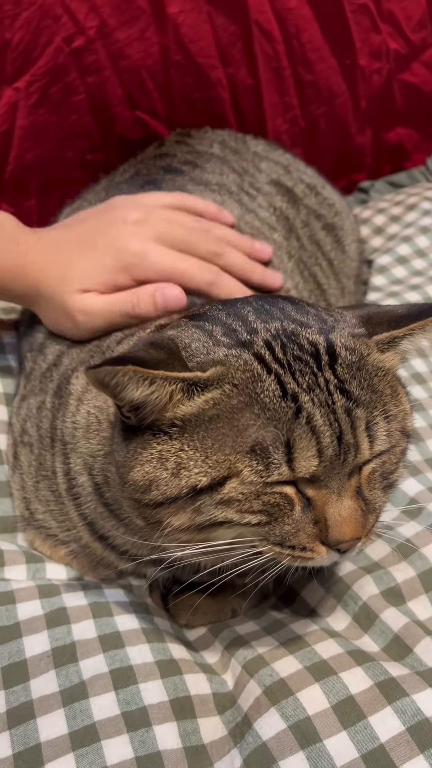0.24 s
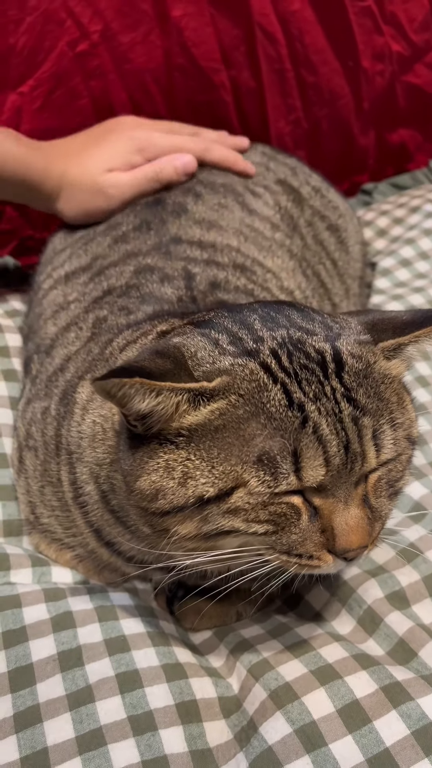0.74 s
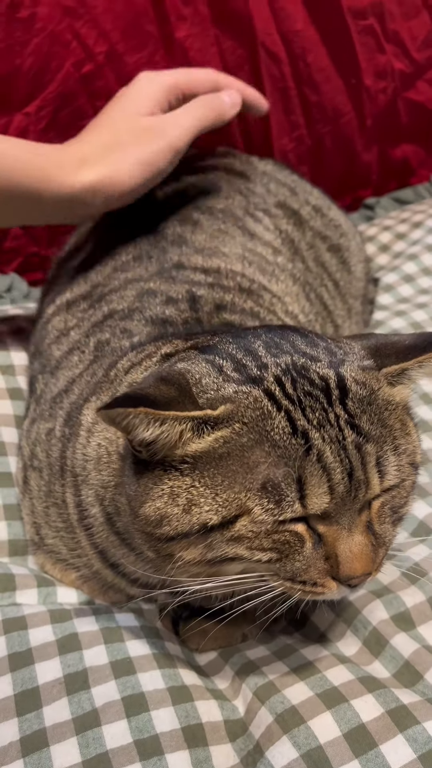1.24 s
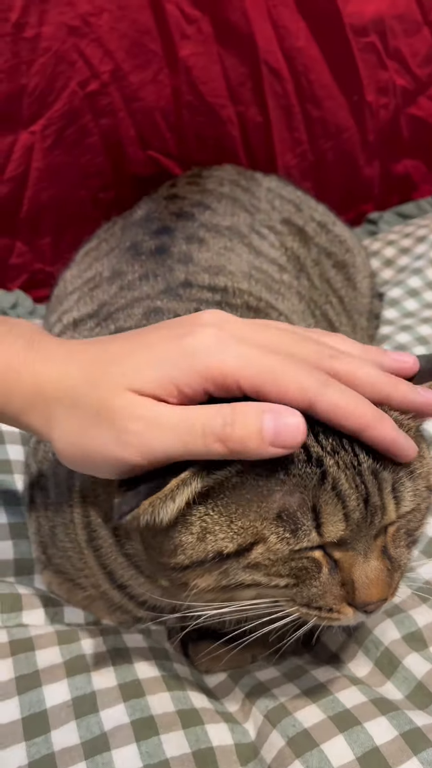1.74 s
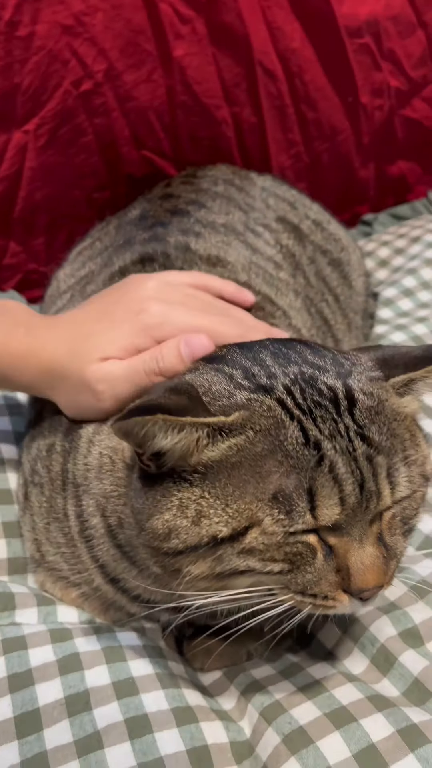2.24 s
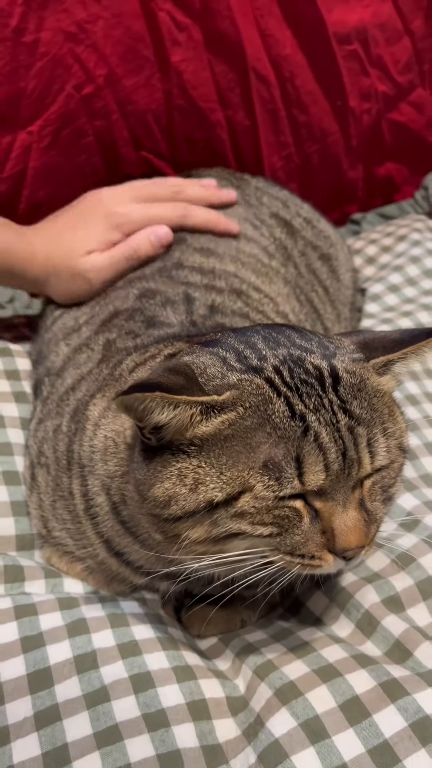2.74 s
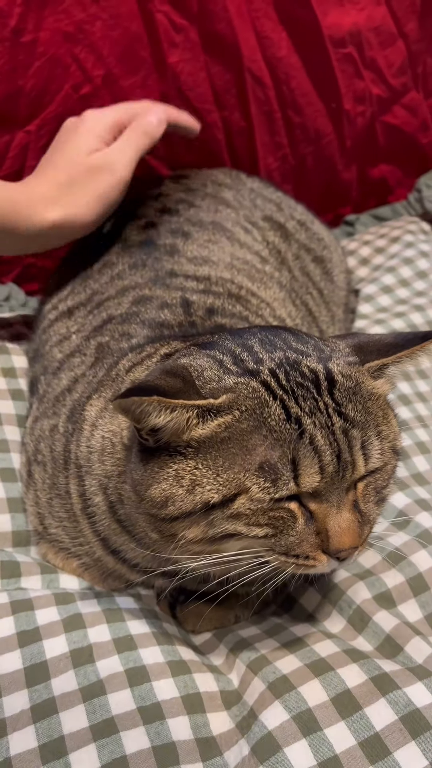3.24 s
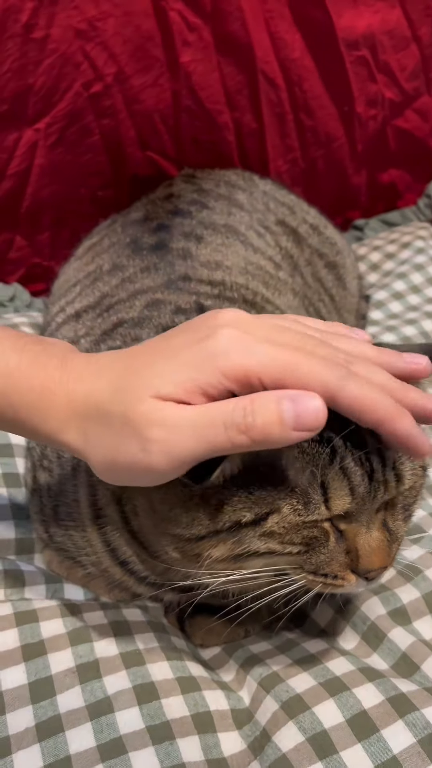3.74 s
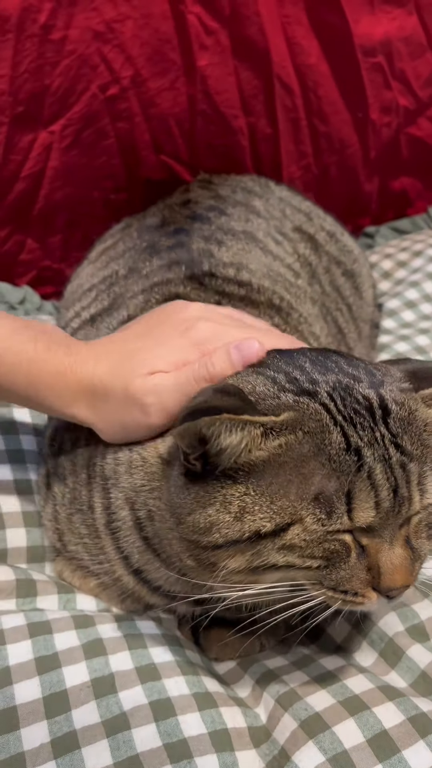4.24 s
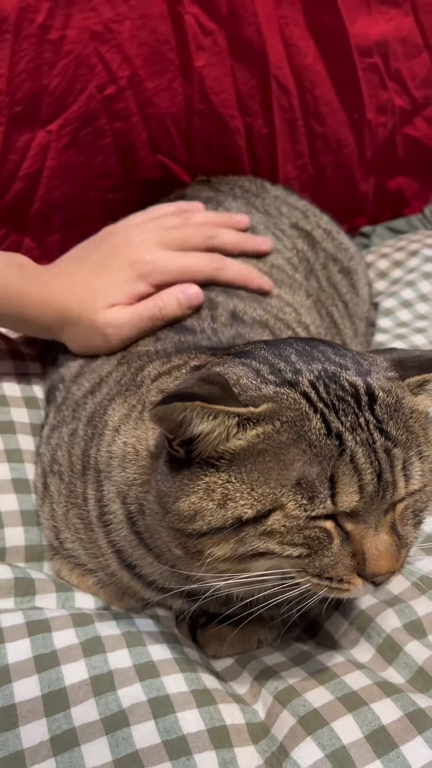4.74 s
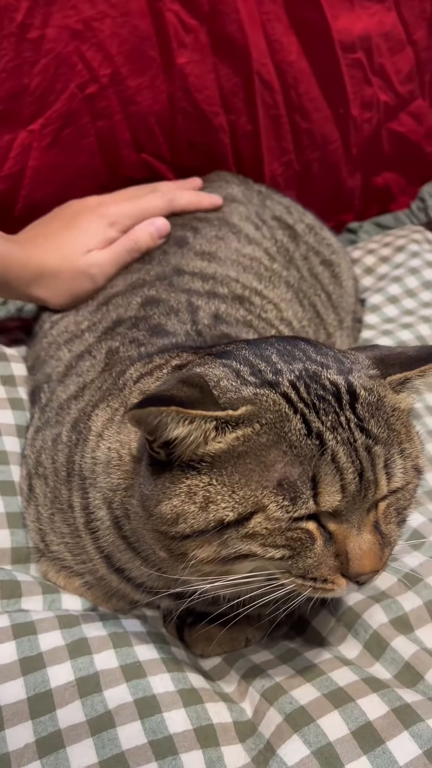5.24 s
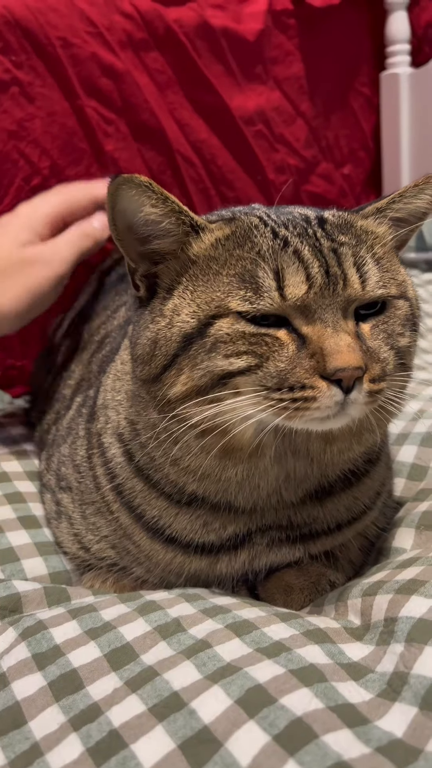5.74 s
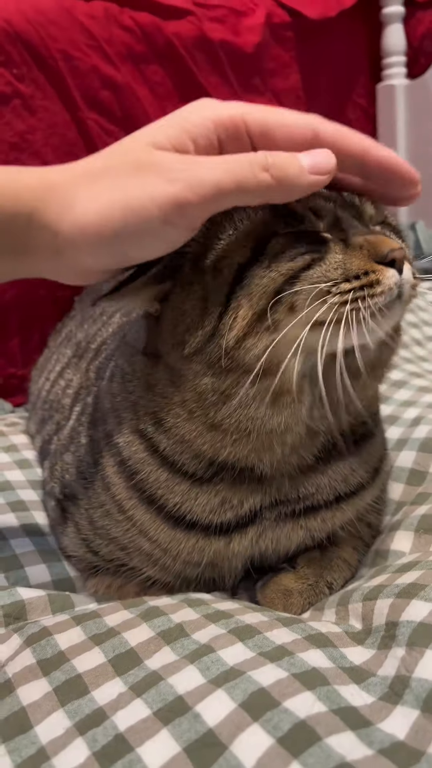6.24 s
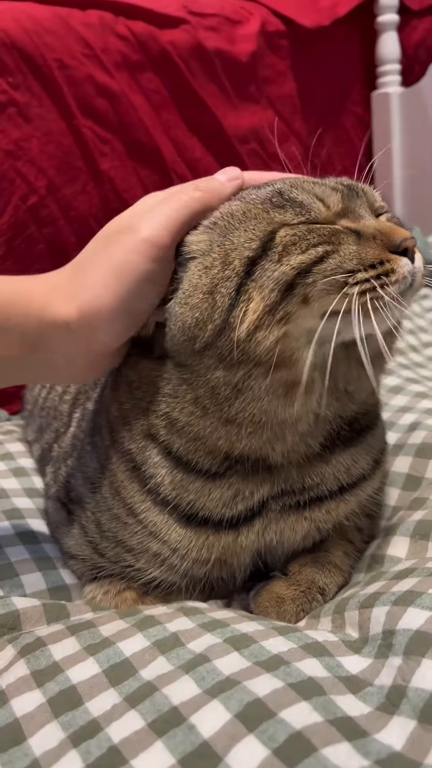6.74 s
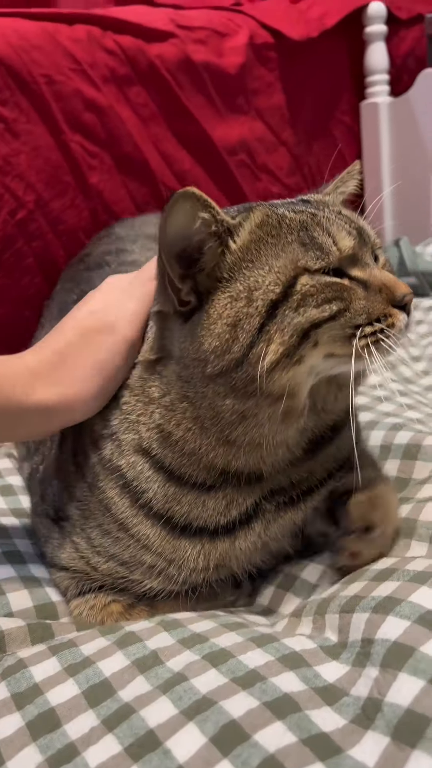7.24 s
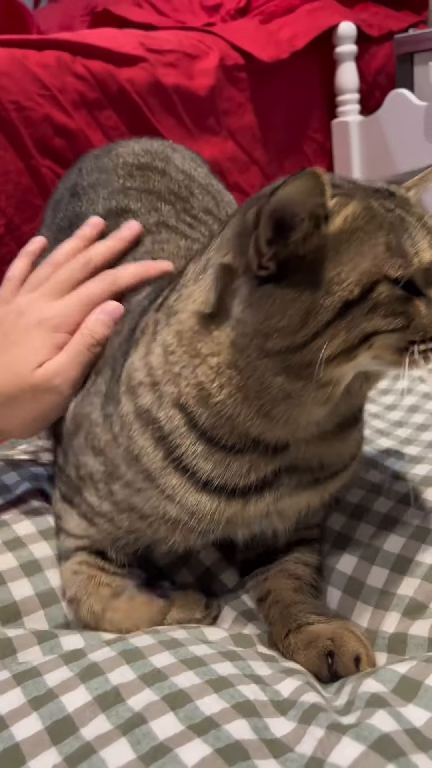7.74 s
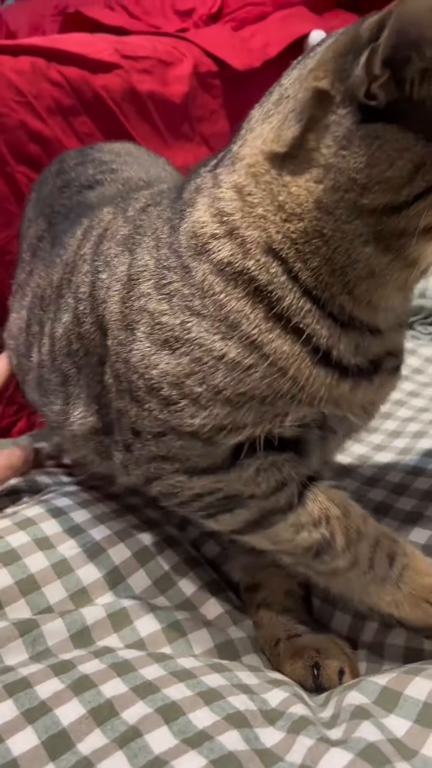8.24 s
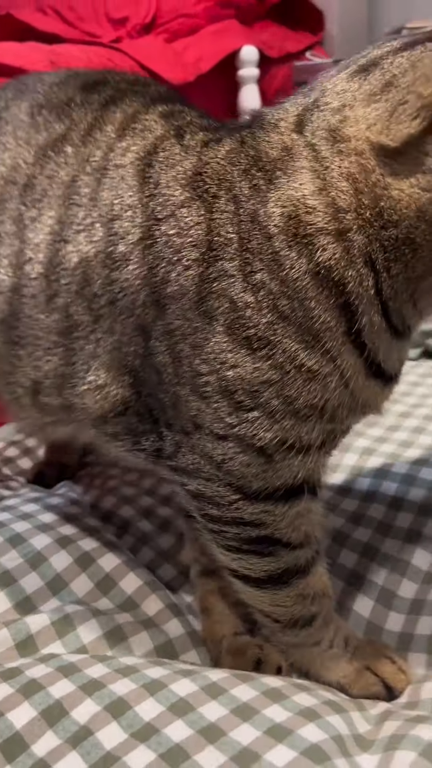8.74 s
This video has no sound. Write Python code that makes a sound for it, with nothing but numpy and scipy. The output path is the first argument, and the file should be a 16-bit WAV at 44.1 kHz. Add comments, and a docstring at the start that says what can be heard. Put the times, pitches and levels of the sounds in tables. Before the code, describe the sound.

A cat's deep, rattling purr comes in separate waves, heard by a close stereo microphone in a dry room with a quiet steady fan. Between waves there are soft fur swishes and dull little knocks from the stroking hand. A tiny dropout and hollow plop come past the middle, then a throatier purr, then rustling sheets and low bumps as the cat rises, ending with short low purr pulses.

```python
"""Cat purring on a bed

Close microphone in a small, soft bedroom: a cat just right of centre purrs in swells while a hand strokes its fur,
and at the end it gets up. Its glottis opens about 25 times a second: a tick, a thump of chest and throat, a gurgle
and a puff of hiss through the nose, a closing tick. Around it, coloured noise makes fur swish, bedding rustle and
mattress rumble, damped bursts and resonances make contacts, knocks and strong single pulses of the purr, and a
steady fan rushes in the room."""
import sys
import numpy as np
from scipy import signal
from scipy.fft import rfft, irfft
from scipy.io import wavfile
from scipy.ndimage import uniform_filter1d

SR = 44100
rng = np.random.default_rng(int(sys.argv[2]) if len(sys.argv) > 2 else 0)


def master(y):
    """Save y as 16-bit WAV."""
    cut = np.clip(np.atleast_2d(y).T, -1, 1)
    pcm = np.round(cut * 32767)  # scale
    wavfile.write(sys.argv[1], SR, pcm.astype(np.int16))


N = 396459
TIME, FREQ = np.arange(N) / SR, np.arange(N // 2 + 1) * SR / N

# All levels in the tables are relative: the gains of the mix come on top.
# Colours of the surroundings: freq_hz, density_db (per Hz)
FAN_COLOUR = [(25, -16.5), (55, 8), (105, -6.5), (200, -2), (400, -19.5), (700, -11), (1000, -12),
              (1300, -14), (1600, -2.5), (2000, -9), (2500, -19), (4000, -24), (6500, -32), (15000, -39)]
MATTRESS_COLOUR = [(20, -11), (35, -27), (52, -5), (70, -11.5), (110, 0), (200, -10.5), (400, -15.5),
                   (1000, -58.5)]
BEDDING_COLOUR = [(150, -29), (350, 17.5), (700, 18.5), (1500, 9.5), (2600, 6.5), (4300, 10.5), (5500, -2),
                  (9000, -3), (15000, -40)]
FUR_COLOUR = [(300, -38), (1000, 7), (3000, -15), (5500, -12.5), (8000, 3.5), (10000, -9), (12000, 8.5),
              (15500, -1.5)]
# Colours of the purr: freq_hz, density_db (per Hz)
NOSE_COLOUR = [(3000, 2.5), (5200, 9), (5700, 2.5), (7000, 8.5), (9000, 6), (10500, -4), (13000, -4.5),
               (15500, -51)]
RASP_COLOUR = [(600, -1), (900, 2), (1500, -15), (2100, 9.5), (2500, 26), (2900, 6), (3300, 8.5), (3900, 0),
               (4700, -26.5), (7000, 4.5), (15000, -52)]
GURGLE_COLOUR = [(450, -10.5), (640, 6.5), (720, -2), (880, 11.5), (1020, 8.5), (1300, -2.5), (1600, 1.5),
                 (2100, -31.5), (4000, -28), (15000, -49)]
OPEN_TICK_COLOUR = [(450, -10.5), (680, -3), (830, -1.5), (1100, 16.5), (1320, 7), (1650, -10), (2100, -9),
                    (2500, 1), (3300, -3), (8000, -16), (15000, -40)]
CLOSE_TICK_COLOUR = [(450, -3), (680, -9), (860, 3), (1020, -2.5), (1300, -13.5), (1650, -6), (2100, -19),
                     (2500, -18), (3300, -20), (8000, -38), (15000, -42)]

# Left-right likeness of diffuse sound: freq_hz, likeness (0-1)
LIKENESS = [(100, 0.95), (300, 0.32), (650, 0.8), (1000, 0.8), (1600, 0.7), (2100, .9), (2600, 0.41),
            (4800, 0.44), (6000, .85), (15000, .85)]
# Phase between the two microphone ports: freq_hz, left_lead_rad
CAT_PHASE = [(0, 0), (200, -.45), (450, -1.1), (600, -1.3), (850, -.3), (1800, -.5), (2500, -3.5),
             (4300, -4.2), (5900, -3.14), (8050, 0), (14600, 9.42), (16000, 11.4)]
ROOM_PHASE = [(0, 0), (200, -.4), (550, -2.8), (900, -2.8), (1200, -1.5), (2100, -.8), (2700, -3),
              (4500, -4.6), (5900, -3.14), (8050, 0), (14600, 9.42), (16000, 11.4)]
# The cat is a little to the right: freq_hz, left_minus_right_db
CAT_BALANCE = [(60, -2), (200, -1), (380, -3), (1300, -3), (2400, 0.5), (4400, -6), (8000, 0)]
# Narrow bands of the voice cancelled by reflections off bed and wall: freq_hz, width_hz
CANCELLED_BANDS = [(141, 12.3), (680, 102)]

# The hand slides over the cat, or the cat shifts on the bed:
# middle_s, length_s, fur_db, bedding_db, mattress_db
SLIDES = [ (1.922, 0.32, -62.5, -71, -50), (2.248, 0.51, -97, -70, -50), (3.595, 0.12, -74, -91, -62),
          (3.964, 0.37, -61, -69.5, -77), (7.178, 0.38, -75, -66, -49), (7.503, 0.32, -70, -60, -49),
          (7.782, 0.25, -68.5, -58, -66), (8.26, 0.98, -80, -63.5, -53), (8.48, 0.24, -67.5, -52.5, -58),
          (8.964, 0.28, -73.5, -58, -39), ]
# Soft contacts of hand, ears, mouth and paws: start_s, peak_db, centre_hz, width_hz, decay_t60_s
TOUCHES = [(1.612, -32.5, 13200, 5000, 0.0034), (2.217, -41, 272, 198, 0.2),
           (3.53, -36, 13000, 5200, 0.0085), (3.597, -38.5, 226, 149, 0.024),
           (4.125, -49.5, 405, 249, 0.059), (4.384, -33.5, 144, 152, 0.21), (5.181, -27, 3600, 1410, 0.021),
           (5.577, -39, 3960, 4900, 0.0042), (5.94, -41, 6300, 7700, 0.0063), (6.765, -38, 173, 180, 0.11),
           (7.16, -37.5, 3900, 3100, 0.25), (7.17, -32, 4170, 3160, 0.023), (7.168, -47, 12100, 5000, .014),
           (7.167, -44.5, 330, 645, 0.082), (7.319, -34.5, 108, 101, 0.092), (7.52, -36, 90, 67.4, 0.33),
           (8.654, -32.5, 105, 59.5, 0.18)]
# Knocks of the hand on the ears, and strong single pulses of the purr:
# start_s, body_db, body_hz, pitch_slide (share), overtone_db (to body), click_db (to body)
KNOCKS_AND_PULSES = [(1.779, -46, 600, -0.36, -4, -14), (1.823, -43, 535, -.1, -10, -20),
                     (1.894, -36, 516, -0.091, -4.5, -14), (2.008, -49.5, 555, -0.33, 3.5, -12),
                     (2.2101, -28.5, 536, -0.1, -6.5, -2), (5.183, -28.5, 493, -0.37, -25, -12),
                     (7.767, -27.5, 366, -0.26, -21, -41), (8.643, -31, 232, -0.081, -19, -35),
                     (8.906, -37, 570, -0.084, -25, -30), (8.946, -32, 534, 0.015, -22, -30),
                     (8.955, -28, 245, -.15, -20, -35)]

# Swells of the purr: start_s, length_s, rate_hz (openings per second),
# hurry_cycles (gained at the start), drag_cycles (lost at the end),
# tone_crescendo (chest and throat, 1 = usual), other_crescendo (other parts but the gurgle, 1 = usual),
# top levels belly_db, chest_db, throat_db, tick_db, gurgle_db, rasp_db, whistle_db, hiss_db
SWELLS = [ (-0.145, 1.16, 25.41, -.11, .39, 1.51, 0.86, -30.5, -29, -26, -36, -46, -48.5, -58.5, -56.5),
          (2.366, 1.085, 25.6, .11, .36, 1.44, 0.92, -32, -30, -27, -37.5, -45, -51.5, -59.5, -57.5),
          (4.827, .85, 24.58, .79, 0, 1.9, 1.17, -30, -30.5, -29.5, -35.5, -53, -45, -64, -55.5),
          (5.525, 1.0, 25.3, .54, 0, 2.2, 1.09, -32.5, -31, -25, -39, -51, -64.5, -59.5, -67),
          (7.730, .85, 24.61, .65, 0, 0.76, 0.5, -32, -34, -30, -55.5, -52.5, -57.5, -58.5, -73),
          (8.865, .6, 24.2, .25, 0, 1.66, 0.39, -54, -35, -17.5, -58, -50, -72, -70, -61), ]
# How each part rises to its top, sags and is released; one row each in the order of the top levels above:
# top_place (0-1 of the swell), rise_db, rise_bow (1 = straight), sag_db, release_db_per_s
ARCS = [ (0.71, 10.5, 3.04, 0, 159), (0.51, 9.5, 1.71, 2.5, 265), (0.9, 24.5, 1.65, 11, 515),
        (0.89, 20, 1.53, 24, 501), (1, 22.5, 0.83, 6, 493), (0.63, 28.5, 2.7, 10, 397),
        (0.6, 44, 4.3, 9, 405), (0.69, 39.5, 3.12, 19, 403), ]
# Throat and chest change shape as the cat moves:
# time_s, throat_ratio, slap_ratio, chest_ratio (of pitch), slap_db (to parting), pitch_slide (share), rasp_db
POSTURE = [ (0, 0.95, 0.81, 0.9, -14, -0.19, -1), (0.8, 0.96, 0.85, 0.92, -7, -0.12, -1.5),
           (2.5, 0.97, 0.98, 0.92, -20, -0.24, 2), (3.4, 0.96, 0.76, 0.93, -3, -0.072, -2.5),
           (5.3, 0.92, 0.93, 0.88, -8.5, -.1, -7.5), (5.65, 0.82, 0.75, 0.855, -9, -0.042, 5),
           (5.87, 0.88, 0.97, 0.81, -5, -0.15, 12), (6.05, 0.99, 1.04, 0.91, -8.5, -0.37, -3),
           (6.4, 1.03, 1.014, 0.94, -12.5, -0.091, -7), (7.8, 0.97, 0.96, 0.946, -13.5, -0.26, 2),
           (8.2, 0.94, 0.88, 0.99, -2, -0.34, -6), (8.42, 0.9, 0.99, 0.91, -5, 0.11, 0),
           (8.57, 1, 1.05, 0.94, -1.5, 0.36, -4), (8.87, 1.5, 0.71, 0.89, 1, -0.018, -4), ]
# Body resonances before the pitch ratios: pitch_hz, width_hz, level_db, lag_s (after the folds part or meet)
BELLY = [(112.8, 33.3, 0, 0.006)]
CHEST = [(236.7, 108, 4, 0.0029), (223.9, 38, -10, 0.0058)]
THROAT = [(374, 134, 10, 0.00412), (442, 51, -28, 0.00092)]
SLAP = [(424, 115, -2.5, -.002), (592, 300, -18, -.001)]  # throat, as the folds slap shut
OPEN_RING = [(1180, 850, 0, -.0005)]  # chirp in the mouth as the folds part
CLOSE_RING = [(980, 460, 5.5, -.002), (837, 220, 0, 0.0016)]  # chirp in the mouth as they meet
# Brief dip in level: start_s, end_s
DIP = (5.376, 5.397)

BEDROOM_T60_S, CUTOFF_HZ = 0.074, 15800
MATTRESS_REST_DB, MATTRESS_SHAKE_DB = -66.5, -5  # rumble at rest; shaken by the purr, relative to the belly
SLIDE_EDGE_DB = 11  # fall from the middle of a slide to its ends
BODY_WIDTH, BODY_OVERTONE = 0.46, 1.835  # of a knock or pulse, as multiples of its body pitch
CLICK_HZ, CLICK_WIDTH_HZ = 2500, 2000
OPEN_S, OPEN_SHRINK = .0135, .35  # open phase; share by which it has shortened at the end of a swell
SAG_BOW = 2.4  # the sag starts gently and steepens
SETTLE_CYCLES = 2.5  # how soon a hurried start settles
PUFF_JITTER_S = 0.0021  # the air peaks a little earlier or later in each cycle
WHISTLE_HZ, WHISTLE_SINK_HZ = 4926, 594
DETUNE, THUMP_DB, TICK_DB, PUFF_DB, GRAIN_DB = .016, .7, 1.2, 1.0, 3.6  # unevenness of the purr


def from_db(db):
    """Decibels to gain."""
    return 10 ** (np.asarray(db) / 20)


def rms_one(x):
    """Scale to unit rms."""
    return x / np.sqrt(np.mean(x ** 2) + 1e-20)


def at_freq(points):
    """A (freq_hz, value) table joined on a log-frequency axis."""
    hz, value = np.transpose(points)
    return np.interp(np.log(FREQ + 1), np.log(hz), value)


def add(out, s, sound):
    """Mix a short sound in at time s."""
    i = int(np.clip(s * SR, 0, N - 1))
    out[i:i + len(sound)] += sound[:N - i]


def colour(x, spectrum):
    """Causal (minimum-phase) filter that falls away below the first point; rms 1."""
    low_cut = 1 + (spectrum[0][0] / (2 * FREQ + 1)) ** 2
    log_gain = np.log(from_db(at_freq(spectrum)) / low_cut)
    cepstrum = irfft(log_gain, N) * (1 + np.sign(N / 2 - np.arange(N)))  # folded to be causal
    return rms_one(irfft(rfft(x) * np.exp(rfft(cepstrum)), N))


def diffuse(spectrum):
    """Coloured noise, partly alike in the two channels."""
    alike = np.clip(at_freq(LIKENESS), 0, 1)
    mid, side = rfft(rng.standard_normal((2, N)))
    pair = np.sqrt(1 + alike) * mid + np.sqrt(1 - alike) * side * [[1], [-1]]
    return colour(irfft(pair, N), spectrum)


def ports(x, phase):
    """The two microphone ports hear each frequency slightly out of step."""
    turn = np.interp(FREQ, *np.transpose(phase))
    return irfft(rfft(x) * np.exp(.5j * turn * [[1], [-1]]), N)


def bedroom(x, wet_db):
    """A short, soft tail of reflections with little bass, different at each port."""
    t = TIME[:SR // 4]
    tail = rng.standard_normal((2, len(t))) * from_db(-60 * t / BEDROOM_T60_S) * (t > .002)
    tail = signal.sosfilt(signal.butter(2, 600, "high", fs=SR, output="sos"), tail)
    tail = rms_one(tail) / np.sqrt(len(t))
    return from_db(wet_db) * signal.fftconvolve(x[None], tail, axes=1)[:, :N]


def cancelled(x):
    """Reflections off bed and wall cancel narrow bands of the voice."""
    for hz, width in CANCELLED_BANDS:
        x = signal.lfilter(*signal.iirnotch(hz, hz / width, fs=SR), x)
    return x


def fan():
    """The fan's soft rush is steady, diffuse turbulence."""
    return from_db(-50.5) * diffuse(FAN_COLOUR)


def slides():
    """Every slide swells and fades like a bell curve; gains of fur, bedding and mattress."""
    power = 0
    for s, length, *levels_db in SLIDES:
        bell = from_db(-SLIDE_EDGE_DB * np.minimum((2 * (TIME - s) / length) ** 2, 20))
        power = power + np.outer(from_db(levels_db), bell) ** 2
    return np.sqrt(power)


def mattress(heave, belly):
    """The low rumble adds the power of rest, shaking by the belly and heaving by the slides."""
    shake = from_db(MATTRESS_SHAKE_DB) * belly
    level = np.sqrt(from_db(MATTRESS_REST_DB) ** 2 + shake ** 2 + heave ** 2)
    return from_db(2.0) * level * diffuse(MATTRESS_COLOUR)


def catching(uneven_db, catch_s):
    """Cloth catches and slips, so its rustle flickers; a gain of mean power 1."""
    grain = rms_one(uniform_filter1d(rng.standard_normal(N), size=max(int(catch_s * SR), 1)))
    return rms_one(from_db(uneven_db * grain))


def bedding(drag):
    """Cloth that is dragged along gives a flickering noise."""
    return from_db(7.0) * drag * catching(uneven_db=3.5, catch_s=0.016) * diffuse(BEDDING_COLOUR)


def fur(stroke):
    """Hairs brushed by the hand swish as smooth noise."""
    return from_db(8.5) * stroke * diffuse(FUR_COLOUR)


def swoop(hz, width, glide):
    """A resonance that swells to height 1 and dies while its pitch slides by a share (negative = down)."""
    t = TIME[:SR // 10]
    u = np.pi * width * t / 2  # 1 at the top of the swell
    bend = glide * np.log(np.cosh(np.minimum(u, 30) - 1)) * 2 / (np.pi * width)
    return u ** 2 * np.exp(2 - 2 * u) * np.sin(2 * np.pi * hz * (t + bend))


def touches():
    """Each contact is a short damped noise burst around its own pitch."""
    out, t = np.zeros(N), TIME[:SR // 4]
    for s, db, hz, width, t60 in TOUCHES:
        low = np.hypot(hz, width / 2) - width / 2  # band edges have hz as geometric mean
        high = min(low + width, SR / 2 - 1)
        band = signal.butter(2, [low, high], "band", fs=SR, output="sos")
        burst = signal.sosfilt(band, rng.standard_normal(len(t)) * from_db(-60 * t / t60))
        add(out, s, from_db(db) * burst / np.abs(burst).max())
    return out


def knocks_and_pulses():
    """Each knock on the ears or strong pulse of the purr has a low body, one overtone and a click."""
    out = np.zeros(N)
    for s, db, hz, glide, overtone_db, click_db in KNOCKS_AND_PULSES:
        body = swoop(hz, BODY_WIDTH * hz, glide)
        body += from_db(overtone_db) * swoop(BODY_OVERTONE * hz, BODY_WIDTH * hz, glide)
        click = from_db(click_db) * swoop(CLICK_HZ, CLICK_WIDTH_HZ, 0)
        add(out, s, from_db(db) * (body + click))
    return out


def plop(s, hz, fall, rise_s, db):
    """A small hollow plop that falls in pitch."""
    out, t = np.zeros(N), TIME[:SR // 25]
    swell = (t / rise_s) ** 2 * np.exp(2 - 2 * t / rise_s)
    add(out, s, from_db(db) * swell * np.sin(2 * np.pi * hz * t * (1 - fall * t)))
    return out


def swelling():
    """Progress through the current swell (0-1) and the gain of each part of the purr along its arc."""
    rows = np.array(SWELLS)
    current = np.maximum(np.searchsorted(rows[:, 0], TIME, side="right") - 1, 0)
    start, length, _, _, _, tone, other, *tops_db = rows[current].T
    depths = other, tone, tone, other, 1, other, other, other  # the gurgle always swells fully
    progress = np.clip((TIME - start) / length, 0, 1)
    released_s = np.maximum(TIME - start - length, 0)
    unbroken = (start > DIP[0]) | (TIME < np.mean(DIP))  # the dip ends the swell that it falls in
    parts = []
    for top_db, depth, (place, rise_db, bow, sag_db, release_db_per_s) in zip(tops_db, depths, ARCS):
        place = np.clip(place, .05, .95)
        rising = np.maximum(1 - progress / place, 0) ** bow
        sagging = np.maximum((progress - place) / (1 - place), 0) ** SAG_BOW
        db = top_db - depth * rise_db * rising - sag_db * sagging - release_db_per_s * released_s
        parts.append(np.abs(uniform_filter1d(unbroken * from_db(db), size=400)))
    return progress, parts


def glottis(jitter_s):
    """Opening times: each swell may start hurried, settles to a steady beat and may drag as the air runs out."""
    times, next_starts = [], [row[0] for row in SWELLS[1:]] + [N / SR]
    for (start, length, rate, hurry, drag, *_), until in zip(SWELLS, next_starts):
        cycle = np.arange(int((until - start) * rate + hurry - drag + .5))
        gained = hurry * (1 - np.exp(-cycle / SETTLE_CYCLES))
        lost = drag * np.minimum(cycle / (length * rate), 1) ** 4
        times.extend(start + (cycle - gained + lost) / rate)
    times = np.array(times) + jitter_s * rng.standard_normal(len(times))
    return times[times > 0]


def thumps(times, modes, uneven_db, detune, shift, glide):
    """Every parting or meeting of the folds rings the body modes, never twice quite alike."""
    out = np.zeros(N)
    for hz, width, db, lag in modes:
        size, pitch = rng.standard_normal((len(times), 2)).T
        gains = from_db(db + uneven_db * size)
        pitches = hz * shift * np.exp(detune * pitch)
        glides = glide * np.ones(len(times))
        for s, gain, f, slide in zip(times, gains, pitches, glides):
            add(out, s + lag, gain * swoop(f, width, slide))
    return rms_one(out)


def ticks(times, ring, glide, spectrum, splutter_db, splutter_s):
    """The moist folds part or meet with a short chirp, at another pitch each time, and a brief splutter."""
    chirps = thumps(times, ring, uneven_db=2.2, detune=.13, shift=1, glide=glide)
    splutter, t = np.zeros(N), TIME[:SR // 50]
    for s in times:
        add(splutter, s, rng.standard_normal(len(t)) * np.exp(-t / splutter_s))
    return rms_one(chirps + from_db(splutter_db) * colour(splutter, spectrum))


def puffs(openings, stretch, peak_s, spread_s, onset, onset_s, leak, uneven_db):
    """Air flow in each cycle: a spurt as the folds part, a swell until they meet, a small leak between."""
    flow = np.zeros(N)
    for s, span, (size, late) in zip(openings, stretch, rng.standard_normal((len(openings), 2))):
        t = TIME[:SR // 30] / span  # the whole puff shortens with the open phase
        swell = np.exp(-.5 * ((t - peak_s - late * PUFF_JITTER_S) / spread_s) ** 2)
        add(flow, s, from_db(uneven_db * size) * (swell + onset * np.exp(-t / onset_s)))
    return flow + leak


def moist_noise(grain_db):
    """Turbulence roughened by tiny wet crackles."""
    grain = rms_one(uniform_filter1d(rng.standard_normal(N), size=30))
    return rng.standard_normal(N) * from_db(grain_db * grain)


def whistle(progress, width_hz):
    """Breathy turbulence in a narrow resonance that sinks ever faster as the swell goes on."""
    lowpass = signal.butter(2, width_hz / 2, fs=SR, output="sos")
    wobble = signal.sosfilt(lowpass, rng.standard_normal((2, N)))
    turn = 2 * np.pi * np.cumsum(WHISTLE_HZ - WHISTLE_SINK_HZ * progress ** 3) / SR
    return rms_one(wobble[0] * np.cos(turn) + wobble[1] * np.sin(turn))


def chest_and_throat(openings, closings, belly, chest, throat):
    """Belly, chest and throat ring as the folds part; the throat rings again as they slap shut."""
    s, *shape, slap_db, slide, _ = np.transpose(POSTURE)
    throat_ratio, slap_ratio, chest_ratio = (np.interp(openings, s, column) for column in shape)
    glide = np.interp(openings, s, slide)
    slap = from_db(np.interp(TIME, s, slap_db))
    belly_ring = thumps(openings, BELLY, THUMP_DB, DETUNE, shift=0.96, glide=0)
    chest_ring = thumps(openings, CHEST, THUMP_DB, DETUNE, shift=chest_ratio, glide=0.44 * glide)
    parting = thumps(openings, THROAT, THUMP_DB, DETUNE, shift=throat_ratio, glide=glide)
    meeting = thumps(closings, SLAP, TICK_DB, DETUNE, shift=slap_ratio, glide=0.15)  # rises in pitch
    voice = (from_db(-5.5) * belly + from_db(-55.5)) * belly_ring  # the belly hums on between swells
    voice += from_db(2.5) * chest * chest_ring
    return voice + from_db(-1.5) * throat * (parting + slap * meeting) / np.hypot(1, slap)


def fold_ticks(openings, closings, tick, chest, throat):
    """A soft purr ticks mostly on opening, a full-throated one on closing."""
    firmness = (throat / (chest + 1e-6) + 1e-6) ** .35
    tick = tick / np.hypot(1, firmness)
    opening = ticks(openings, OPEN_RING, -.28, OPEN_TICK_COLOUR, splutter_db=-6, splutter_s=0.004)
    closing = ticks(closings, CLOSE_RING, -0.26, CLOSE_TICK_COLOUR, splutter_db=-3, splutter_s=0.0041)
    return from_db(-4.5) * tick * opening + from_db(-2.0) * firmness * tick * closing


def throat_gurgle(openings, stretch, gurgle):
    """Air forced between the narrowing folds gurgles."""
    squeeze = puffs(openings, stretch, peak_s=.0118, spread_s=.0045, onset=.2, onset_s=.003,
                    leak=.05, uneven_db=TICK_DB)
    return gurgle * colour(squeeze * moist_noise(GRAIN_DB), GURGLE_COLOUR)


def nasal_air(openings, stretch, progress, rasp, whistling, hiss):
    """Pulsed turbulence rasps while the glottis is open; flow at the nostrils peaks later, whistling and hissing."""
    s, *_, rasp_db = np.transpose(POSTURE)
    rasping = from_db(np.interp(TIME, s, rasp_db))
    passage = puffs(openings, stretch, peak_s=.0095, spread_s=.0038, onset=.45, onset_s=.003,
                    leak=.05, uneven_db=2 * PUFF_DB)
    nostrils = puffs(openings, stretch, peak_s=.0115, spread_s=.0031, onset=.28, onset_s=.004,
                     leak=.06, uneven_db=PUFF_DB)
    air = from_db(7) * rasping * rasp * colour(passage * moist_noise(GRAIN_DB), RASP_COLOUR)
    air += whistling * rms_one(nostrils * whistle(progress, width_hz=280))
    return air + from_db(6.0) * hiss * colour(nostrils * moist_noise(grain_db=5), NOSE_COLOUR)


def purr(progress, parts):
    """One train of glottal openings drives the voice and the nasal air."""
    belly, chest, throat, tick, gurgle, rasp, whistling, hiss = parts
    openings = glottis(jitter_s=.00045)
    # the pulses grow compact towards the end of a swell
    stretch = 1 - OPEN_SHRINK * np.interp(openings, TIME, progress) ** 4
    closings = openings + OPEN_S * stretch + .0008 * rng.standard_normal(len(openings))
    voice = chest_and_throat(openings, closings, belly, chest, throat)
    voice += fold_ticks(openings, closings, tick, chest, throat)
    voice += throat_gurgle(openings, stretch, gurgle)
    return cancelled(voice), nasal_air(openings, stretch, progress, rasp, whistling, hiss)


def scene():
    """The cat in front, fur and bedding around it, the room behind."""
    progress, parts = swelling()
    stroke, drag, heave = slides()
    around = fan() + mattress(heave, belly=parts[0]) + bedding(drag) + fur(stroke)
    voice, air = purr(progress, parts)
    body = voice + touches() + knocks_and_pulses()
    body += plop(s=5.423, hz=767, fall=2.7, rise_s=0.0049, db=-32.5)
    balance = from_db(at_freq(CAT_BALANCE) * [[.5], [-.5]])
    near = irfft(rfft(ports(body + air, CAT_PHASE)) * balance, N)
    echoes = bedroom(body, wet_db=-10) + bedroom(air, wet_db=-9)
    return near + echoes + ports(around, ROOM_PHASE)


def record(dry):
    """The level dips for an instant by some 27 dB; the deepest bass and the top are cut."""
    on = uniform_filter1d(1. * ((TIME < DIP[0]) | (TIME > DIP[1])), size=30)
    dry = signal.sosfilt(signal.butter(2, 28, "high", fs=SR, output="sos"), dry)
    top_cut = signal.ellip(12, .1, 90, CUTOFF_HZ, fs=SR, output="sos")
    return signal.sosfilt(top_cut, dry * (0.041 + 0.87 * on))


dry = scene()
out = record(dry)
master(out)
```